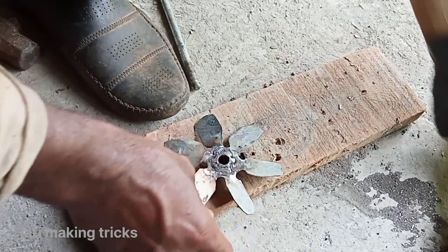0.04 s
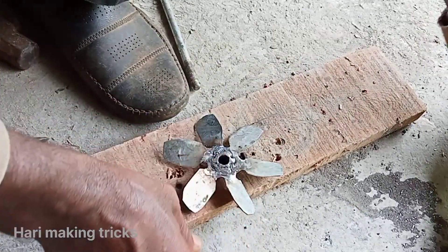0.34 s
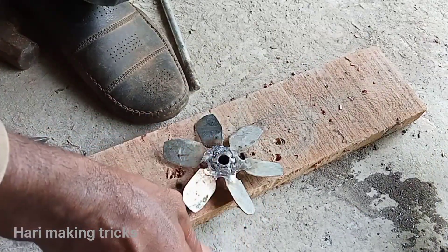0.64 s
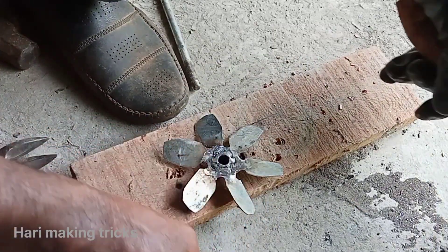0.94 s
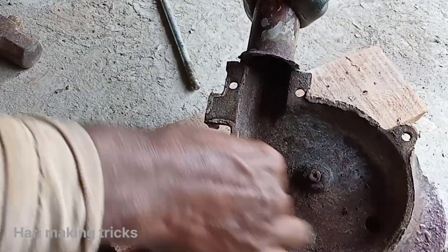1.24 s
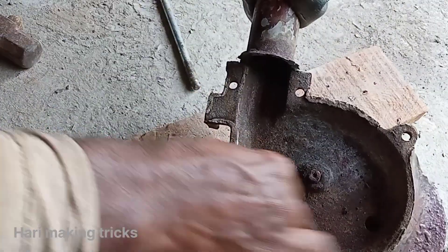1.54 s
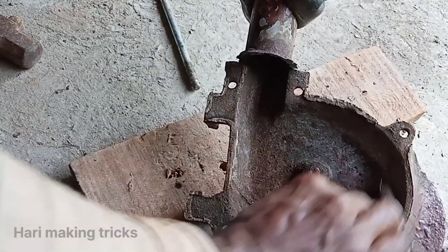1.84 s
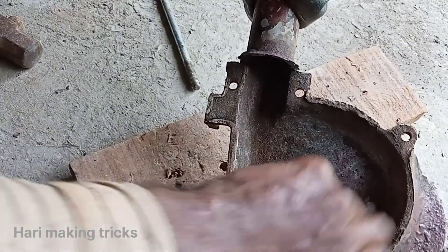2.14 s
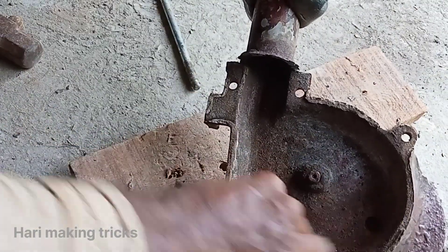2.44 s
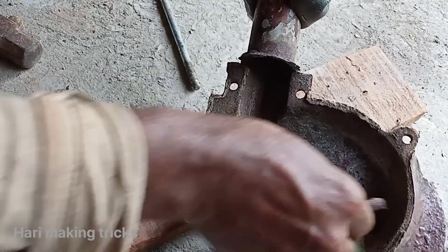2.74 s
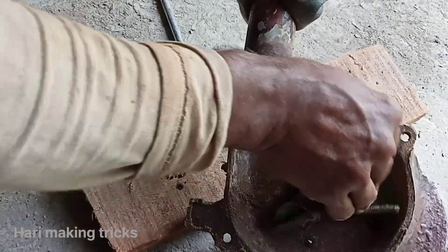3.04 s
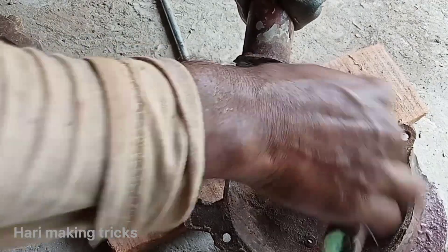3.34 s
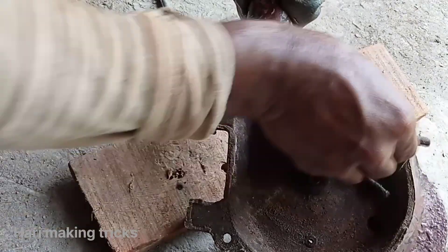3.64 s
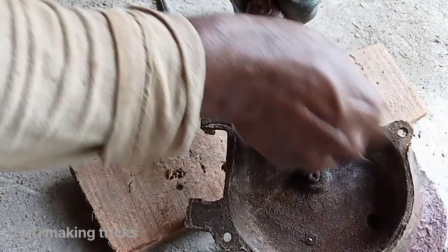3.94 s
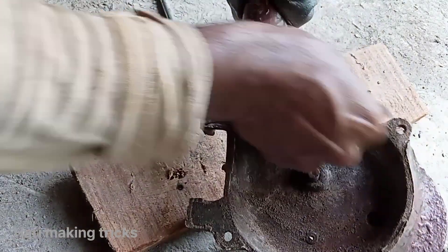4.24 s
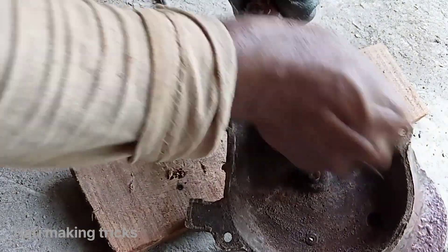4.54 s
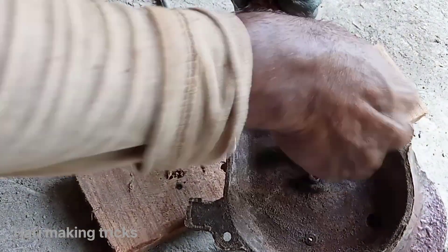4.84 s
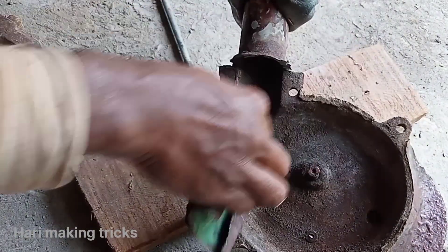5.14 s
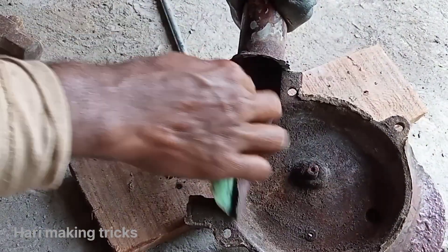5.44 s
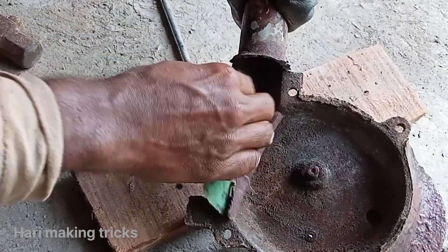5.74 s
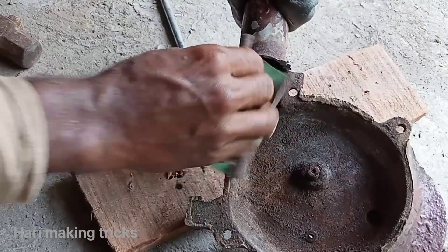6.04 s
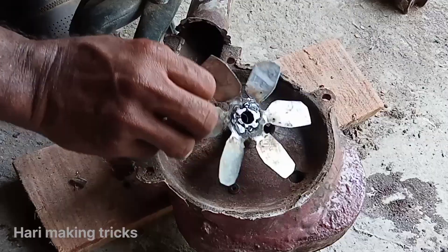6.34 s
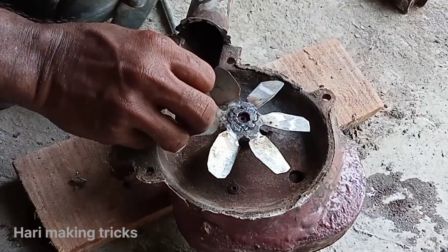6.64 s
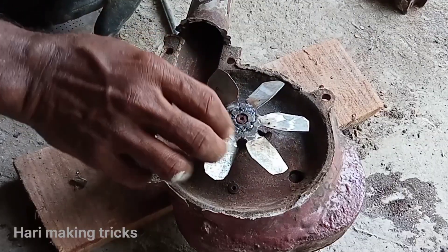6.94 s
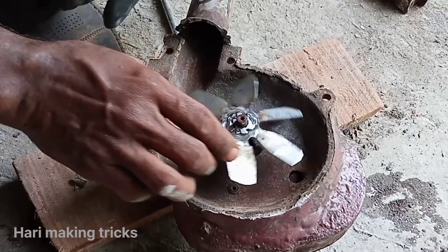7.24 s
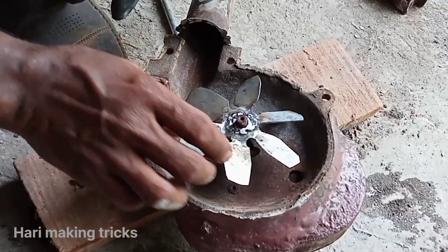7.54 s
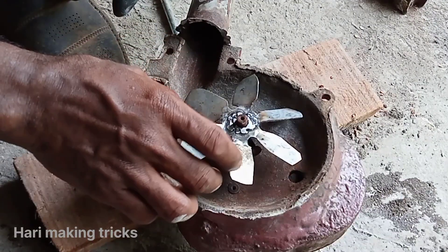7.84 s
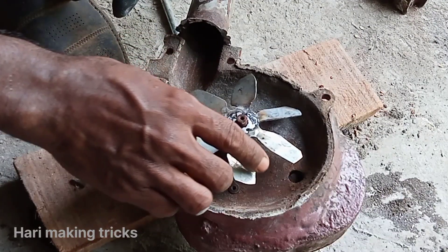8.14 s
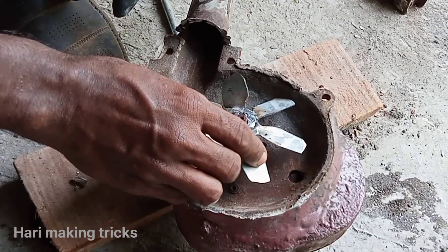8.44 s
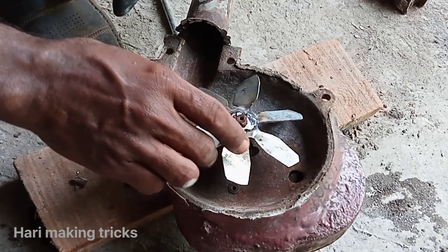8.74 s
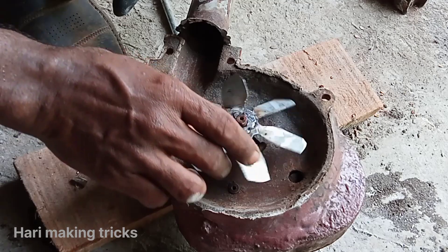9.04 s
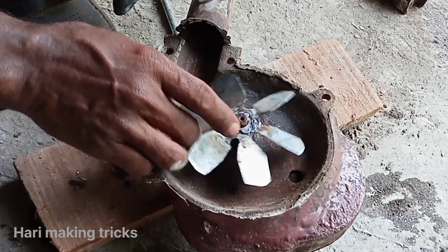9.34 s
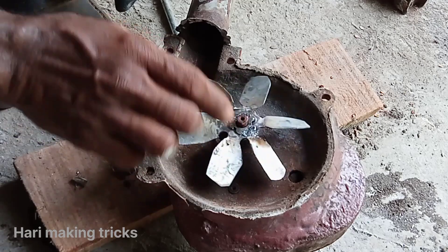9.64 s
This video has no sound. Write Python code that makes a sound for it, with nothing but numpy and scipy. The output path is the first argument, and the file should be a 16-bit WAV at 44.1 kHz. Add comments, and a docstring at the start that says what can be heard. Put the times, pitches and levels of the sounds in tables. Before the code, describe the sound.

Close by in a quiet workshop with a little echo, parts slide over concrete and knock on a board, and something heavy thuds down. Rapid, gritty rasping follows as a steel blade works inside a rusty iron blower housing, squealing briefly when it catches. The scraping weakens and stops. A small metal fan is set in place with sharp, ringing clinks, then ticks and chimes faintly as a finger nudges it.

```python
"""Shuffling, wooden knocks and a thud, then quick rasping strokes and bright clinks: a hand blower is being
mended on a concrete workshop floor. Parts slide about and knock on a plank, and the heavy cast-iron
housing lands on it. A steel blade scrapes out the rust, screeching as it bites and ringing the casting.
The small metal impeller is dropped on its shaft and nudged round with a finger; its hub and blades
chime. The bare room rings along."""
import sys
import numpy as np
from scipy import signal
from scipy.fft import rfft, irfft
from scipy.io import wavfile

SR = 44100
rng = np.random.default_rng(int(sys.argv[2]) if len(sys.argv) > 2 else 0)


def transcribe(u):
    """Save the signal u as a 16-bit wav file named by the first command-line argument.

    u: samples, shape (n,) or (channels, n), limited to [-1, 1]; the rate is SR.
    q: integer samples, one column per channel.
    """
    v = np.clip(np.atleast_2d(u).T, -1, 1)
    q = np.round(v * 32767).astype(np.int16)
    wavfile.write(sys.argv[1], SR, q)


N = 428211
TIME = np.arange(N) / SR
SCRAPE_START_S, SCRAPE_END_S = 1.0535, 6.264

# strokes of the steel blade: t/s, length/s, force/dB, swell/dB,
# then, relative to the force: hollow bass/dB, gritty treble/dB, first bite/dB
STROKES = [ (1.02, .036, -45.5, 1.5, -6.5, -16, -15), (1.133, .008, -42, 1, -5, -14.5, 3),
           (1.172, .14, -33.5, 8.5, -7, -12.5, -3), (1.497, 0.097, -30.5, 0.5, -10, -13.5, -11),
           (1.869, 0.0071, -27.5, 2, -25, -16.5, -1), (1.938, .25, -28.5, -4.5, -12.5, -13.5, 0),
           (2.39, 0.0072, -33.5, 8.5, -16.5, -16, 1), (2.461, .12, -27.5, 1, -14.5, -13, 3),
           (2.619, 0.088, -28, .5, -9.5, -12, -15), (3.078, 0.086, -26.5, 1, -17.5, -16, -8),
           (3.172, 0.15, -27, 6.5, -13.5, -14.5, -15), (3.769, 0.0074, -35, -6.5, -4.5, -10.5, -1),
           (3.86, 0.074, -29.5, 6, -12.5, -12, -13), (4.031, .064, -44.5, 10, -12, -13, -12),
           (4.184, .008, -33, -3, -14, -10.5, -0.5), (4.208, 0.092, -29, 2, -13.5, -13.5, -9),
           (4.394, 0.044, -29.5, -1.5, -14.5, -13, -7), (4.486, .068, -28, 2.5, -15.5, -11.5, -10),
           (4.671, .047, -29, -3, -17.5, -11, 1), (4.772, .06, -28.5, 4.5, -13.5, -12, -2),
           (4.901, .084, -44, -3.5, -13, -17, -12), (4.977, 0.023, -45, -4, -4.5, -16.5, 7.5),
           (5.081, 0.068, -45, 4, -8, -15, -8.5), (5.137, .132, -33.5, 9.5, -10, -10.5, -10),
           (5.33, .084, -49.5, -3, -7, -8.5, -12), (5.487, .062, -39.5, -4, -9, -11.5, 3),
           (5.588, 0.073, -36.5, 2.5, -8.5, -7.5, 0), (5.745, 0.0071, -40, 1.5, -10, -12, 4.5),
           (5.826, .022, -37, -4.5, -10, -16, 1), (5.884, 0.0094, -41.5, 1.5, -7, -5, -6),
           (5.921, 0.051, -40, 3.5, -5, -8, -7), (6.178, .086, -52.5, 8, -0.5, -17.5, -10)]
# tone colour of a hard contact: f/Hz, level/dB
CONTACT = [(80, 0.5), (300, 4), (900, 6.5), (4200, 4), (5200, -25.5), (8000, -7), (12000, -13),
           (15000, -36)]


def amp(db):
    """Decibels to gain."""
    return 10 ** (np.asarray(db) / 20)


def unit(x):
    """Scale to rms 1."""
    return x / np.sqrt(np.mean(x ** 2))


def on_octaves(points, hz):
    """Read (f/Hz, value) points on a log-frequency axis."""
    f, value = np.transpose(points)
    return np.interp(np.log(hz), np.log(f), value)


def colour(x, points, size=1024):
    """Minimum-phase EQ through (f/Hz, level/dB) points, built from its cepstrum."""
    hz = np.maximum(np.fft.rfftfreq(4 * size, 1 / SR), 1)
    cepstrum = irfft(np.log(amp(on_octaves(points, hz))))
    cepstrum[1:2 * size] *= 2
    cepstrum[2 * size + 1:] = 0
    return signal.oaconvolve(x, irfft(np.exp(rfft(cepstrum))))[:len(x)]


def band(x, lo, hi, order=4):
    """Band-pass from lo to hi Hz."""
    sos = signal.butter(order, [lo, min(hi, SR / 2 - 1)], "band", fs=SR, output="sos")
    return signal.sosfilt(sos, x)


def resonate(x, hz, width):
    """One resonance, gain 1 at its centre."""
    return signal.lfilter(*signal.iirpeak(hz, hz / width, fs=SR), x)


def fade(t, t60):
    """Exponential decay, 60 dB down after t60."""
    return np.exp(-np.log(1000) * t / t60)


def add(track, s, sound):
    """Mix a sound into the track at time s."""
    start = int(s * SR)
    track[start:start + len(sound)] += sound[:N - start]


def wander(per_s):
    """Slow or fast random drift with rms 1."""
    return unit(np.interp(TIME * per_s, np.arange(8192), rng.standard_normal(8192)))


def room_tone():
    """A faint bed of workshop air; it drops at 1.05 s and comes back up at 6.26 s."""
    # spectrum of the air: f/Hz, level/dB
    spectrum = [(15, -50.5), (25, -21), (75, -2), (164, -6.5), (246, -9.5), (523, -13), (741, -16),
                (848, -15), (1170, -17), (1490, -18.5), (1750, -20), (2230, -16.5), (3170, -18.5),
                (4620, -35), (15500, -47.5)]
    air = unit(colour(rng.standard_normal(N), spectrum)) * amp(-58.5 + .5 * wander(3.3))
    stage = np.searchsorted([SCRAPE_START_S, SCRAPE_END_S], TIME)
    return air * amp([.5, -11, .1])[stage]


def push(length, swell_db, attack_s, release_s, linger_db=-120, linger_t60=1):
    """Envelope of one push of the hand: it rises, swells evenly in dB, lets go and may ring on."""
    t, after = TIME[:int(length * SR)], TIME[:int(.7 * SR)]
    held = amp(swell_db * (t / length - .5))
    linger = min(amp(linger_db), 1) * (1 - np.exp(-length / 0.035))  # a short push leaves less ring
    tail = (1 - linger) * fade(after, release_s) + linger * fade(after, linger_t60)
    gain = np.concatenate([held, amp(swell_db / 2) * tail])
    return gain * np.minimum(TIME[:len(gain)] / attack_s, 1)


def friction(per_s, spread_db, hiss):
    """Tiny random slips, their sizes scattered by spread_db, over a smooth rubbing hiss."""
    slips = (rng.random(N) < per_s / SR) * rng.choice([-1, 1], N)
    sizes = amp(spread_db * np.minimum(rng.exponential(size=N), 4))
    return unit(slips * sizes) + hiss * rng.standard_normal(N)


def scatter(x, wet_db, t60):
    """Reverb of a moving source: its echoes keep changing, so only their fading energy stays."""
    energy = signal.lfilter([1], [1, -fade(2 / SR, t60)], x ** 2)
    envelope = np.sqrt(energy * np.mean(x ** 2) / energy.mean())
    return x + amp(wet_db) * envelope * rng.standard_normal(N)


def shuffle():
    """Cloth and iron slide over dusty concrete and the plank; overlapping slides add in power."""
    # slides of sleeve and parts: t/s, length/s, level/dB, swell/dB, relative hiss/dB
    slides = [(.02, 0.098, -63.5, 9, -11), (0.103, 0.14, -54, -2, -7.5), (0.251, .46, -53.5, -2, -16),
              (0.353, 0.025, -46, -2, -14.5), (0.74, 0.1, -47.5, 14.5, -17),
              (0.866, 0.14, -42, -6.5, -20.5)]
    # tone colour of the rubbing: f/Hz, level/dB
    spectrum = [(35, -41), (60, -4.5), (309, 0.5), (727, -5.5), (855, 0), (1130, -6.5), (1450, -2.5),
                (1830, -3.5), (3580, -6), (5060, -33), (7160, -19), (8420, -28.5), (15000, -30)]
    body_power, hiss_power = np.zeros((2, N))
    for s, length, db, swell_db, hiss_db in slides:
        slide = amp(db) * push(length, swell_db, attack_s=.012, release_s=0.27)
        add(body_power, s, slide ** 2)
        add(hiss_power, s, (amp(hiss_db) * slide) ** 2)
    slips = friction(per_s=700, spread_db=0, hiss=0.88)
    rub = colour(scatter(slips, wet_db=-8.5, t60=0.13), spectrum)
    body, hiss = unit(band(rub, 70, 4800)), unit(band(rub, 5100, 20000))
    return np.sqrt(body_power) * body + np.sqrt(hiss_power) * hiss


def tick(hz, t60, crack):
    """A brief contact of peak 1: a damped swing at one pitch with a burst of crushed grit."""
    t = TIME[:SR // 8]
    swing = np.sin(2 * np.pi * hz * t) + crack * rng.standard_normal(len(t))
    hit = colour(swing * fade(t, t60) * (1 - np.exp(-t / 0.00023)), CONTACT)
    return hit / np.abs(hit).max()


def room(x, wet_db, build_s=0.0042):
    """Direct sound plus the diffuse ring of bare walls; the treble dies first."""
    # reverb time of the workshop: f/Hz, t60/s
    decay = [(200, 0.69), (1400, 0.64), (3700, 0.55), (9700, 0.47), (15000, 0.075)]
    t, edges = TIME[:SR], np.geomspace(60, 16000, 9)
    noise = rng.standard_normal(SR)
    tail = sum(band(noise, lo, hi, order=2) * fade(t, on_octaves(decay, np.sqrt(lo * hi)))
               for lo, hi in zip(edges, edges[1:]))
    early_boost = 1 + 1.93 * fade(t, 0.11)  # dense reflections off the floor and nearby things
    tail = tail * (1 - np.exp(-t / build_s)) * early_boost
    return x + amp(wet_db) * signal.fftconvolve(x, unit(tail) / np.sqrt(SR))[:N]


def knocks():
    """Short dull knocks of iron on wood."""
    # hits on the plank: t/s, level/dB, f/Hz, t60/s
    hits = [(.11, -42, 2000, .01), (.122, -40.5, 807, .02), (.277, -41, 1400, .012),
            (.371, -31, 593, 0.021), (.881, -17.5, 1754, 0.024), (.902, -22, 2200, .008),
            (0.952, -18.5, 690, .011), (1.033, -19.5, 2420, 0.0098)]
    out = np.zeros(N)
    for s, db, hz, t60 in hits:
        add(out, s, amp(db) * tick(hz, t60, crack=0.94))
    return room(band(out, 180, 5500, order=2), wet_db=-3.0)


def thud(at_s=1.0302, peak_db=-9):
    """The landing casting drives the low modes of the plank, which is too small to radiate deep bass."""
    # modes of the plank: f/Hz, level/dB, t60/s
    plank = [(173.5, -11, 0.085), (217.5, -1.5, 0.056), (316, -5.5, 0.046), (380, -12.5, .03),
             (910, -11, 0.03)]
    out, t = np.zeros(N), TIME[:SR // 8]
    modes = sum(amp(db) * np.sin(2 * np.pi * hz * t) * fade(t, t60) for hz, db, t60 in plank)
    boom = band(modes * (1 - np.exp(-t / 0.0021)), 105, 6000, order=2)
    add(out, at_s, -amp(peak_db) * boom / np.abs(boom).max())
    return out


def stroke_envelopes(attack_s=.016, release_s=0.085, graze_s=0.029):
    """How hard the strokes of an unsteady hand drive the rasp's three bands: bass, body and grit."""
    resting_db = (-68, -61, -81)  # the blade keeps brushing the iron between strokes
    extra_swell_db = (2.8, 0, 0.7)  # a stroke grows hollower and grittier toward its end
    linger_t60 = (0.48, 0.56, 0.41)
    power = np.ones((3, N)) * amp(resting_db)[:, None] ** 2
    graze = amp(-17) * push(graze_s, 0, attack_s, release_s)  # the edge skims the rust, then digs in
    for s, length, force_db, swell_db, bass_db, grit_db, _ in STROKES:
        for k, band_db in enumerate([bass_db, 0, grit_db]):
            stroke = push(length, swell_db + extra_swell_db[k], attack_s, release_s,
                          linger_db=-4.1, linger_t60=linger_t60[k])
            gain = amp(force_db + band_db)
            add(power[k], s - graze_s, (gain * graze) ** 2)
            add(power[k], s, (gain * stroke) ** 2)
    hand_pressure = amp(0.92 * wander(28))
    return np.sqrt(power) * hand_pressure


def scraping():
    """The blade chatters over rust: clustered slips ring the casting, coloured by the spot scraped."""
    # resonances of the housing: f/Hz, width/Hz, level/dB relative to the slips
    housing = [(660, 30, -3.5), (873, 31, -16), (964, 18, -1), (1054, 13, 3), (1118, 17, 2),
               (1640, 9.9, -3.5), (1650, 6, -37), (1869, 18, 1), (2010, 17, 3.5), (2175, 20, -30),
               (2212, 34, 0.5), (2334, 93, -1.5), (2490, 27, -25.5), (2800, 27, -12), (2750, 13, -6),
               (2980, 36, -6), (3185, 57, -1.5), (3393, 46, -0.5), (3870, 19, -2)]
    # tone colour on the near wall, along the rim and across bowl and outlet: f/Hz, level/dB
    wall = [(60, -47), (200, -17.5), (450, -16), (650, -6), (880, -3), (1400, -8.5), (2250, 2.5),
            (2620, -4.5), (3250, 2), (3950, -5.5), (5000, -22.5), (7500, -10.5), (10000, -18),
            (15000, -20.5)]
    rim = [(60, -31), (200, -27.5), (300, -17.5), (450, -16), (1010, -8.5), (1320, -14), (2230, 0),
           (2720, -5.5), (3750, -2.5), (4400, -18), (5130, -23.5), (7600, -16.5), (9500, -23),
           (15000, -25.5)]
    bowl = [(60, -30), (200, -25.5), (280, -14), (400, -18.5), (700, -12.5), (1050, -9), (1300, -11),
            (2300, -2), (3750, -5), (4400, -16), (5130, -23.5), (7600, -12.5), (9500, -19.5),
            (15000, -21.5)]
    chatter = friction(per_s=3000, spread_db=2.0, hiss=0.27) * amp(2.0 * wander(300))
    chatter = scatter(chatter, wet_db=-3, t60=0.35)
    snapping_flakes = amp(-12.5) * friction(per_s=70, spread_db=4.0, hiss=0)
    slips = chatter + snapping_flakes
    # each resonance swells and sinks as the edge travels over the iron
    iron = slips + sum(amp(db + 3.2 * wander(7)) * resonate(slips, hz, width)
                       for hz, width, db in housing)
    bands = np.zeros((3, N))
    for start_s, end_s, spectrum in [(1, 1.84, wall), (1.84, 3.03, rim), (3.03, 6.3, bowl)]:
        span = slice(int(start_s * SR), int(end_s * SR))
        rasp = colour(iron[span], spectrum)
        bass = amp(-0.76) * unit(band(rasp, 70, 1400))
        body = amp(-1.18) * unit(band(rasp, 1400, 4800))
        grit = amp(-0.04) * unit(band(rasp, 4800, 17000))
        bands[:, span] = bass, body, grit
    return room((bands * stroke_envelopes()).sum(axis=0), wet_db=-9.0)


def bites():
    """As the edge catches, a burst of slips makes the blade screech; each grip retunes it a little."""
    # bending modes of the steel blade: f/Hz, width/Hz, level/dB
    scraper = [(850, 44, -14.5), (2050, 59, 6.5), (2266, 66, 4.5), (3260, 36, -10), (3690, 68, -1)]
    out, t = np.zeros(N), TIME[:SR // 2]
    slips = friction(per_s=4000, spread_db=1.5, hiss=0.54)
    for s, length, force_db, *_, bite_db in STROKES:
        burst = slips[int(s * SR):][:len(t)]
        grip = rng.standard_normal((len(scraper), 2))
        steel = sum(amp(db + 0.83 * press) * resonate(burst, hz * (1 + 0.016 * bend), width)
                    for (hz, width, db), (press, bend) in zip(scraper, grip))
        screech = band(colour(steel + amp(-19) * burst, CONTACT), 540, 17000, order=2)
        decay = fade(t, t60=.06 + 0.49 * length)  # a long stroke screeches longer
        add(out, s, amp(force_db + bite_db) * unit(screech) * decay)
    return room(out, wet_db=-8.5)


def rocking():
    """Low grumble of the casting as it rocks against the plank under firm pushes, and again as the impeller
    lands on it."""
    # spells of rocking: t/s, length/s, level/dB
    spells = [(2.348, .27, -57), (3.08, 0.13, -58.5), (3.87, 1, -68), (6.33, .5, -63)]
    # low resonances of the housing on the plank: f/Hz, width/Hz, level/dB
    seat = [(120, 14, 2), (157, 28, -5.5), (282, 52, -6.5)]
    slips = friction(per_s=150, spread_db=2.5, hiss=0.23)
    power = np.zeros(N)
    for s, length, db in spells:
        add(power, s, (amp(db) * push(length, 0, attack_s=0.028, release_s=0.91)) ** 2)
    grumble = sum(amp(db) * resonate(slips, hz, width) for hz, width, db in seat)
    return np.sqrt(power) * unit(band(grumble, 70, 450, order=2))


def mode_rings(modes, sibling_gain, detune, count=4):
    """One row per mode: a fading tone plus detuned, longer-ringing siblings from the unequal blades."""
    t = TIME[:int(.7 * SR)]
    rows = []
    for hz, db, t60 in modes:
        tone = np.sin(2 * np.pi * hz * t) * fade(t, t60)
        sibling_hz = hz * (1 + detune * rng.standard_normal(count))
        siblings = sum(np.sin(2 * np.pi * f * t) for f in sibling_hz) * fade(t, 1.3 * t60)
        rows.append(amp(db) * (tone + sibling_gain * siblings))
    return np.array(rows) * (1 - np.exp(-t / 0.0017))


def strike(rings, balance_db):
    """Mix the modes with the balance that the spot hit gives them; peak 1."""
    out = (amp(balance_db)[:, None] * rings).sum(axis=0)
    return out / np.abs(out).max()


def impeller():
    """Each contact ticks, then hub and thin blades ring on; on a light touch the finger damps the blades."""
    # contacts: t/s, tick level/dB, tick f/Hz, hub ring/dB, blade ring/dB, blade tilt/(dB per octave)
    clinks = [(6.341, -30, 1880, -47.5, -72, -2), (6.4593, -15, 2990, -24, -62, 0),
              (6.635, -36, 3440, -45, -46, 9), (6.82, -43, 3000, -63, -54, 6),
              (6.868, -43.5, 2670, -72, -54, 9), (7.253, -51, 2410, -57, -57, 6),
              (7.3517, -13, 1690, -54, -23.5, -1), (7.374, -22.5, 3800, -50, -24.5, 3.5),
              (8.351, -43, 2450, -65, -62, -1), (8.7816, -32.5, 2490, -64, -41, 8.5),
              (8.80, -39, 2400, -54, -47, 5), (9.054, -49, 3050, -62, -55.5, 2),
              (9.264, -44.5, 2600, -73, -51, -1), (9.285, -40.5, 700, -71, -47, -3.5),
              (9.578, -43, 2410, -61, -52, -5)]
    # modes of the hub on its shaft, with the casting under it: f/Hz, level/dB, t60/s
    hub_modes = [(680, -19.5, 1), (2660, -13, .5), (2960, -2.5, 0.11), (2920, -13, 0.2), (3520, -17, 0.29),
                 (3680, -12, .4), (3800, 1, 0.35), (4150, -16, 0.36), (5669, -26, 0.24), (8250, -25, .3),
                 (8140, -14, 0.26), (10460, -32, 0.18), (12000, -31, .22)]
    # modes of the impeller blades: f/Hz, level/dB, t60/s
    blade_modes = [(687, -16, 0.87), (1415, -1, 0.51), (1735, -2, 0.28), (2080, -4, 0.6),
                   (2493, -2.5, 0.36), (3203, 1.5, 0.16), (3677, -1.5, 0.47), (3816, -2.5, 0.45),
                   (4140, -9, 0.5), (4360, -10, .38), (4560, -15, 0.22), (6660, -11.5, 0.41),
                   (7000, -16, 0.23), (8200, -8, 0.08), (8210, -7, 0.28), (8760, -11, 0.24),
                   (9050, -11, 0.19), (10410, -22, .25), (11000, -12, 0.28), (11620, -14, .28),
                   (12130, -15, .3), (12700, -19, .26), (13110, -24, .25)]
    hub = mode_rings(hub_modes, sibling_gain=0.58, detune=.03)
    blades = mode_rings(blade_modes, sibling_gain=0.25, detune=.015)
    octave = np.log2(np.array(blade_modes)[:, 0])
    finger = fade(TIME[:blades.shape[1]], t60=0.96)
    ticks, rings = np.zeros((2, N))
    for s, tick_db, hz, hub_db, blade_db, tilt_db in clinks:
        light = tick_db < -27
        contact = amp(tick_db) * tick(hz, t60=0.013, crack=1.6)
        # a soft push makes little treble
        contact = band(contact, 200, 4600, order=2) if light else band(contact, 650, 16000, order=1)
        add(ticks, s, contact)
        add(rings, s, amp(hub_db) * strike(hub, 1.2 * rng.standard_normal(len(hub))))
        spread_db = 3.2 if light else .9  # a touch picks out a few modes; a hard blow shakes them all
        shimmer = strike(blades, tilt_db * octave + spread_db * rng.standard_normal(len(blades)))
        add(rings, s, amp(blade_db) * shimmer * (finger if light else 1))
    return room(ticks, wet_db=3.5) + room(rings, wet_db=-8)


def scene():
    """Handling gives way abruptly to scraping, then the impeller clinks; both channels are alike."""
    handling = (TIME < SCRAPE_START_S) * (shuffle() + knocks() + thud())
    scrape_gate = (TIME >= SCRAPE_START_S) & (TIME < SCRAPE_END_S)
    derusting = scrape_gate * (scraping() + bites())
    mono = handling + derusting + rocking() + impeller() + room_tone()
    return np.array([mono, mono])


def record(dry, top_hz=15700):
    """A steep low-pass takes off the very top."""
    return signal.sosfilt(signal.ellip(10, .2, 70, top_hz, fs=SR, output="sos"), dry)


dry = scene()
out = record(dry)
transcribe(out)
```